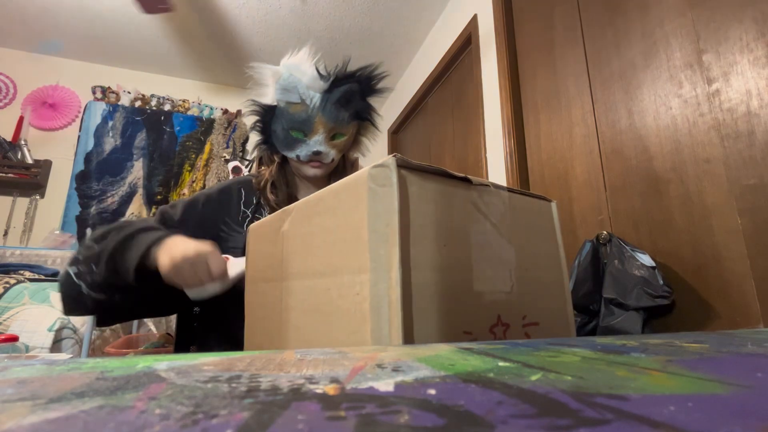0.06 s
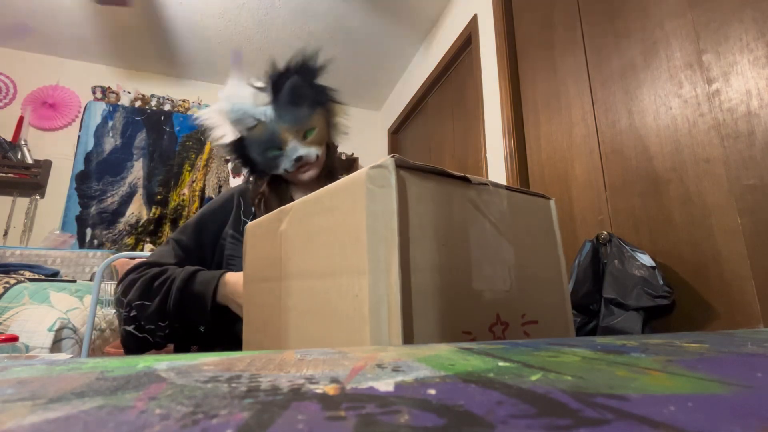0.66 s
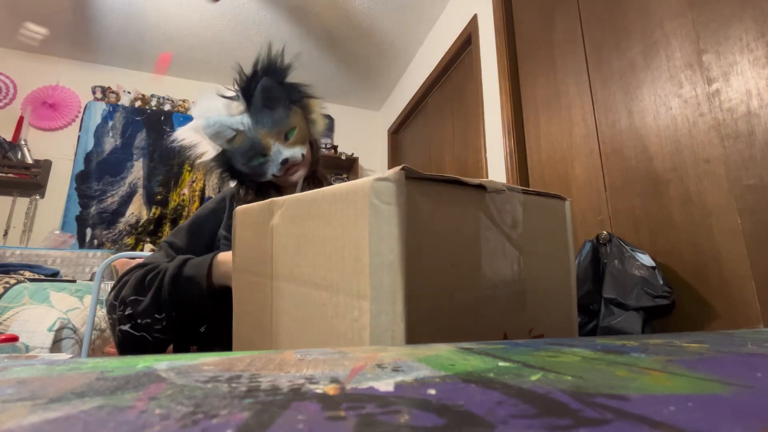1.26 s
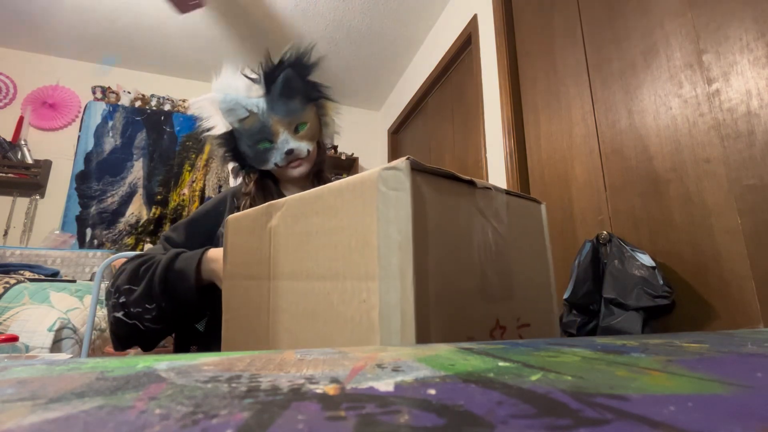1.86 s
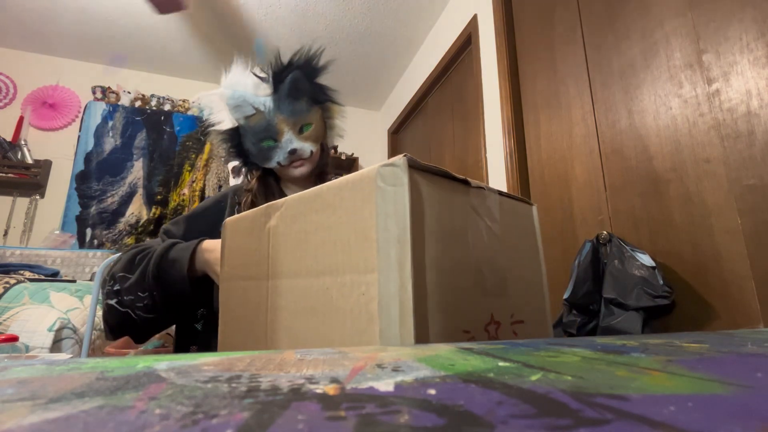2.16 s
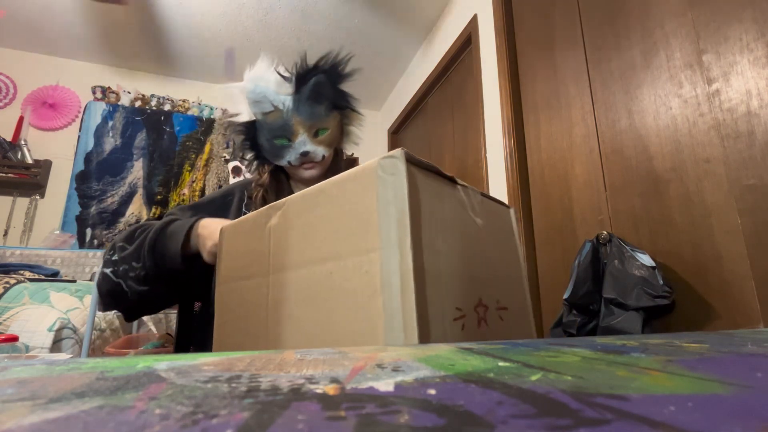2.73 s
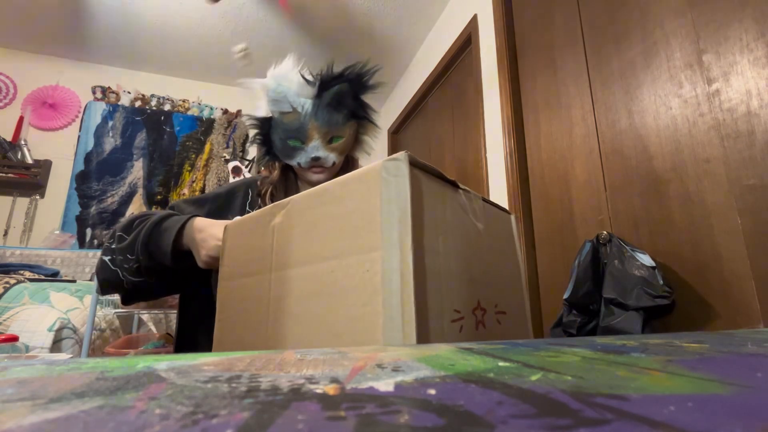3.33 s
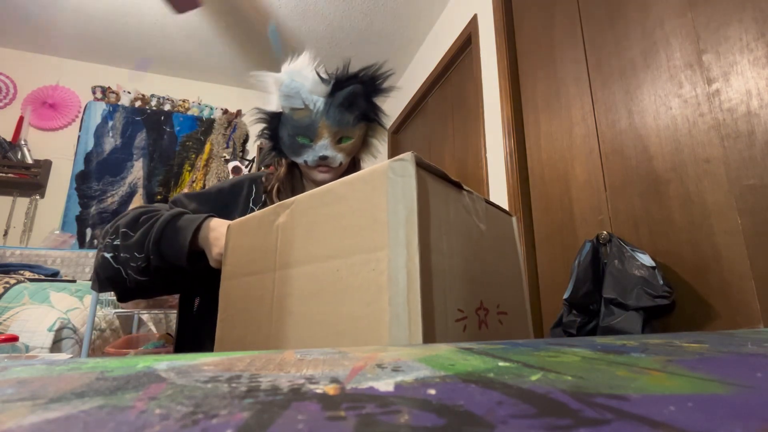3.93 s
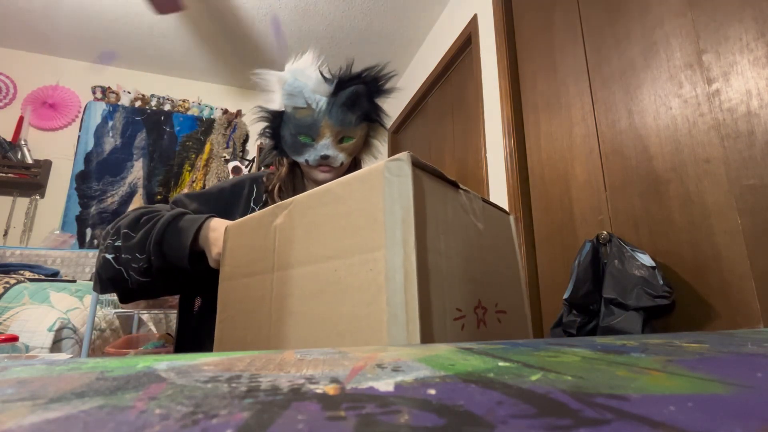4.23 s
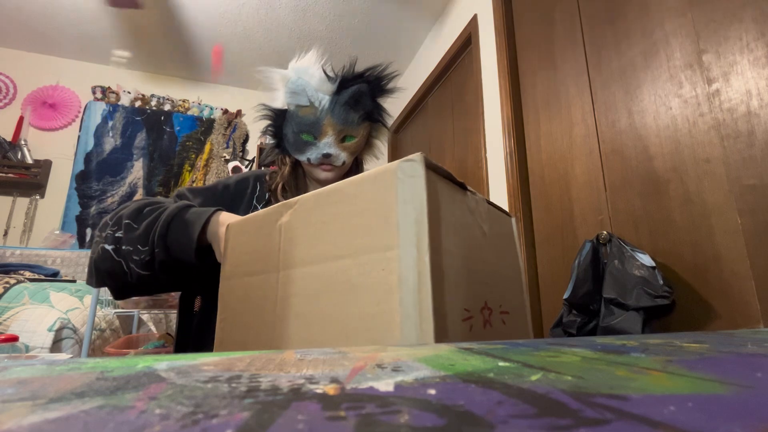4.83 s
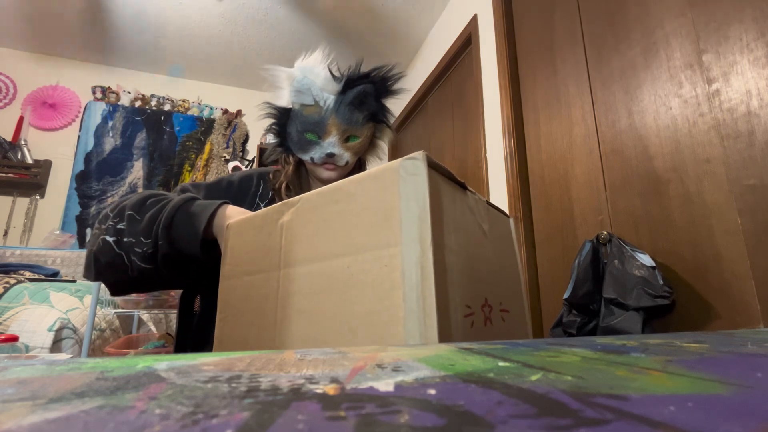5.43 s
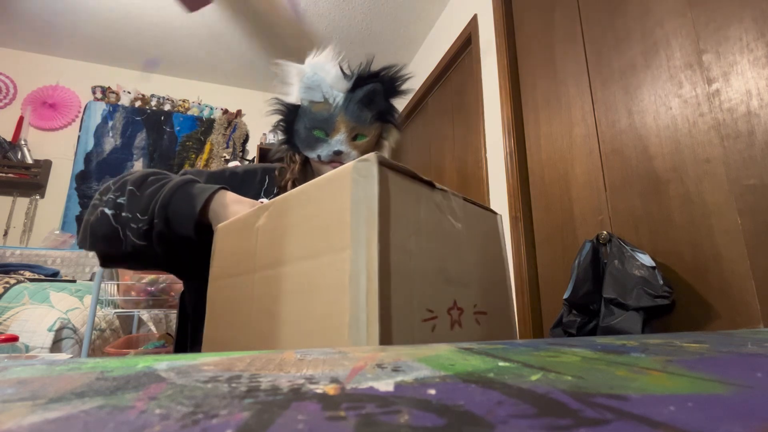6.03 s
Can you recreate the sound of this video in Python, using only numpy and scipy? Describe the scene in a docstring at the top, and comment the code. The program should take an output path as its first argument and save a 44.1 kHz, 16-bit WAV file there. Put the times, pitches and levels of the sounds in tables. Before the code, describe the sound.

Scissors cut through the tape on a large cardboard box, close by in a small, quiet room with little echo. For the first two seconds the blade slides in light, scratchy strokes, with tiny crackles and soft knocks that ring the hollow box, easing off briefly around 1 second. At about 2.3 seconds it sticks and judders with a short squeak. At 2.55 seconds it pops through with a thump and sharp clicks, the loudest moment, and a smaller snap follows. From 3.2 seconds the strokes press harder, hissing on the tape and rasping on the cardboard over a low rumble from the panels. Creaky judders return around 3.9 seconds. More pops, knocks and clicks cluster near 4.8 seconds, followed by short squeaky catches and scrapes until about 5.6 seconds. A last stroke fades at 6 seconds.

```python
"""Scissors work through the tape on the far side of a large cardboard box, in a small room.
First the blade slides along the seam in light strokes, breaking fibres, with soft knocks that run
over the panels as falling chirps and ring the hollow box. At 2.3 s it sticks and judders; at 2.55 s
it pops through with sharp clicks. From 3.2 s the strokes press harder, from 3.9 s it judders again,
more pops come near 4.8 s, and a last stroke fades at 6 s."""
import sys
import numpy as np
from scipy import signal
from scipy.fft import rfft, irfft, next_fast_len
from scipy.io import wavfile
from scipy.ndimage import uniform_filter1d

SR = 44100
rng = np.random.default_rng(int(sys.argv[2]) if len(sys.argv) > 2 else 0)


def master_out(mix):
    """Clip the mix to full scale and print it as 16-bit PCM to the path in sys.argv[1]."""
    frames = np.transpose(np.atleast_2d(mix))
    ceiling = np.clip(frames, -1, 1)
    pcm = np.round(ceiling * 32767).astype(np.int16)
    wavfile.write(sys.argv[1], SR, pcm)


N = 268569
BINS_HZ = np.fft.rfftfreq(N, 1 / SR)

# Blade pushes, before trim: (start [s], swell [s], length [s], hiss [dB], rasp [dB], rumble [dB])
PUSHES = [(-0.01, 0.013, 0.011, -63.5, -90, -64), (0.063, 0.035, 0.027, -63, -61.5, -55),
          (0.163, 0.08, 0.15, -69.5, -62.5, -61), (0.31, 0.031, 0.22, -93, -63, -66),
          (0.483, 0.066, 0.11, -68.5, -57.5, -48), (0.614, 0.0253, 0.11, -72.5, -61.5, -56),
          (0.75, 0.0255, 0.16, -82, -75.5, -66), (0.965, 0.042, 0.092, -97, -90, -65.5),
          (1.08, 0.012, 0.008, -83, -96, -78.5), (1.328, 0.0255, 0.033, -73, -74, -65),
          (1.332, 0.21, 0.37, -76.5, -69, -58), (1.773, 0.003, 0.014, -59, -58, -54.5),
          (1.8, 0.03, 0.12, -90, -76, -73), (1.998, 0.131, 0.36, -103.5, -70, -48.5),
          (2.034, 0.1293, 0.14, -63, -52, -61), (2.337, 0.0746, 0.092, -73.5, -60, -42),
          (2.492, 0.026, 0.16, -66.5, -63, -55), (2.537, 0.004, 0.0072, -47.5, -49.5, -41),
          (2.661, 0.056, 0.12, -64, -68.5, -50), (2.779, 0.021, 0.0433, -82, -69, -50),
          (3.179, 0.0251, 0.24, -62.5, -54, -52), (3.257, 0.047, 0.058, -80, -65.5, -41),
          (3.47, 0.1067, 0.177, -63, -56, -58), (3.634, 0.0414, 0.085, -53, -52, -54),
          (3.858, 0.0242, 0.088, -60.5, -41, -38), (3.889, 0.0336, 0.083, -57, -49.5, -39),
          (4.1, 0.0254, 0.025, -50, -42.5, -45.5), (4.113, 0.015, 0.17, -55, -52.5, -49.5),
          (4.283, 0.1225, 0.11, -73, -52, -40.5), (4.435, 0.0173, 0.054, -60.5, -52.5, -47),
          (4.54, 0.1247, 0.14, -53, -51.5, -50), (4.612, 0.0308, 0.055, -57, -47, -34.5),
          (4.795, 0.013, 0.079, -51.5, -39.5, -46), (5.006, 0.0311, 0.063, -56.5, -40.5, -50),
          (5.046, 0.0366, 0.11, -49.5, -47.5, -46.5), (5.198, 0.032, 0.092, -63.5, -54, -56),
          (5.226, 0.0473, 0.087, -58, -51, -44), (5.489, 0.021, 0.0427, -74, -47, -42.5),
          (5.556, 0.046, 0.069, -83.5, -59.5, -59), (5.59, 0.085, 0.12, -52.5, -50, -49.5),
          (5.743, 0.0557, 0.3, -61, -55.5, -50)]
# Hand steadying the box, before trim: (hiss [dB], rasp [dB], rumble [dB])
RESTING_HAND = (-84, -80.5, -77.5)
def push_levels(blade_release_db_per_s=307, panel_release_db_per_s=217):
    """Hiss, rasp and rumble in dB: pushes add their power to that of the resting hand."""
    power = from_db(RESTING_HAND)[:, None] ** 2 * np.ones(N)
    for start_s, swell_s, length_s, *levels_db in PUSHES:
        t = np.arange(max(0, -start_s), length_s + .5, 1 / SR)
        rise = np.sin(np.pi / 2 * np.clip(t / swell_s, 0, 1)) ** 2
        released_s = np.clip(t - length_s, 0, 1)
        blade = rise * from_db(-blade_release_db_per_s * released_s)
        panel = rise * from_db(-panel_release_db_per_s * released_s)
        for layer, level_db, envelope in zip(power, levels_db, [blade, blade, panel]):
            add(layer, start_s, (from_db(level_db) * envelope) ** 2)
    return 10 * np.log10(power)


def fibres(level_db, spectrum, per_s, spread_db, flutter_db, flutter_hz, trim_db):
    """Fibres break under the blade, many small and a few large, heard through the box."""
    sizes = from_db(spread_db * np.minimum(rng.exponential(1, N), 4))
    clicks = sizes * rng.choice([-1, 1], N) * (rng.random(N) < per_s / SR)
    force = clicks * from_db(flutter_db * wander(flutter_hz, N))
    return unit_rms(box_modes(force, lambda f: gain(spectrum, f))) * from_db(level_db + trim_db)


# Spectra of tape, card, panel and tearing fibres: (frequency [Hz], level [dB])
TAPE_HISS = [(300, -18), (900, 5.5), (1500, -4), (2200, -1.5), (2800, -1.5), (3600, -2), (5300, 0),
             (7000, -5), (9500, -10), (12000, -14), (15500, -12)]
CARD_RASP = [(60, -10), (160, -3.5), (260, -1), (450, 1), (700, -1), (1000, -6), (1900, -8.5),
             (2800, -22.5), (6000, -50)]
PANEL_RUMBLE = [(25, -18), (55, 1.5), (100, 1.5), (135, 2.5), (170, -10), (300, -18), (800, -50.5)]
FIBRE_SNAP = [(300, -56), (900, 10), (1800, 5), (3500, -1.5), (6000, 6.5), (8500, -1), (11000, -4),
              (15500, -8)]
# Edge of the scrape, set by blade angle: (time [s], treble boost [dB])
BLADE_EDGE = [(0, 12), (0.8, 15.5), (1.8, 14.5), (2.3, 11.5), (3.4, 3), (5.3, 4.5), (5.7, 7.5), (5.95, 17)]
def blade_scrape(shelf_hz=7000, ripple_db=-0.03):
    """The sliding blade hisses on the tape, rasps on the card and shakes the panel."""
    hiss_db, rasp_db, rumble_db = push_levels()
    hiss = fibres(hiss_db, TAPE_HISS, per_s=6000, spread_db=1.5,
                  flutter_db=-1.95, flutter_hz=74.2, trim_db=-3.5)
    rasp = fibres(rasp_db, CARD_RASP, per_s=2000, spread_db=0.5,
                  flutter_db=1.43, flutter_hz=57.5, trim_db=-2.5)
    rumble = fibres(rumble_db, PANEL_RUMBLE, per_s=670, spread_db=1.8,
                    flutter_db=0, flutter_hz=25, trim_db=-8)
    crackle = fibres(hiss_db, FIBRE_SNAP, per_s=260, spread_db=0.5,
                     flutter_db=0.5, flutter_hz=15, trim_db=-14)
    hz, t, bands = signal.stft(hiss + rasp + crackle, SR, nperseg=512, noverlap=384)
    # Contact moving over the flaps: a trace of ripple in narrow bands.
    ripple = uniform_filter1d(rng.standard_normal(bands.shape), size=3, axis=0)
    ripple = unit_rms(uniform_filter1d(ripple, size=45, axis=1))
    shelf = hz ** 2 / (hz ** 2 + shelf_hz ** 2)
    edge_db = np.outer(shelf, np.interp(t, *np.transpose(BLADE_EDGE)))
    bands = bands * from_db(ripple_db * ripple + edge_db)
    return signal.istft(bands, SR, nperseg=512, noverlap=384)[1][:N] + rumble


# Blade knocks and tape pops, before trim: (time [s], body [dB], centre [Hz], thump [dB], snap [dB])
KNOCKS_AND_POPS = [(0.09, -56.5, 530, -50.5, -76), (0.122, -47, 590, -45.5, -89),
                   (0.179, -49.5, 228, -66, -68), (0.341, -39, 412, -53.5, -68),
                   (0.463, -37.5, 670, -76, -58), (0.528, -70.5, 503, -51, -67),
                   (0.629, -42, 308, -77, -90), (0.684, -28.5, 408, -54, -63),
                   (0.868, -47.5, 346, -70, -90), (0.902, -44, 417, -57, -75),
                   (0.968, -49.5, 394, -56, -98), (1.595, -26.5, 450, -55, -50.5),
                   (1.781, -45.5, 700, -64, -53), (2.107, -38.5, 493, -49, -76.5),
                   (2.42, -48, 470, -47, -60), (2.472, -42.5, 244, -70, -68), (2.55, -17, 566, -30, -31.5),
                   (2.554, -9.5, 270, -24.5, -37), (2.563, -23, 200, -30.5, -52),
                   (2.753, -28.5, 700, -58, -48.5), (3.075, -48.5, 600, -51, -93.5),
                   (3.152, -44, 610, -43, -71), (3.204, -41, 497, -52.5, -81),
                   (3.246, -36, 480, -46, -80.5), (3.662, -43.5, 680, -70, -52.5),
                   (3.74, -43.5, 574, -41.5, -68), (3.841, -41.5, 452, -50, -64),
                   (3.876, -28, 420, -73, -70), (4.447, -24.5, 560, -46.5, -53.5),
                   (4.476, -35, 506, -54, -69), (4.633, -44.5, 200, -55, -66),
                   (4.649, -30.5, 494, -64.5, -61), (4.701, -33, 221, -43, -69),
                   (4.741, -26, 697, -29, -43.5), (4.882, -19, 340, -45, -39), (4.891, -24, 497, -56, -57),
                   (5.037, -29, 1080, -63, -50.5), (5.322, -35.5, 570, -53, -53.5),
                   (5.694, -65, 745, -43.5, -48)]
def knock(time_s, body_db, centre_hz, thump_db, snap_db, size=6144):
    """A blow spreads as a bending wave, treble first, and bounces between the panel edges."""
    t = np.arange(size) / SR
    lead_samples = size // 32
    bounces, crack = rng.standard_normal((2, size))
    blow = 0.06 * bounces * np.exp(-t / 0.0086)
    blow[0] = 1
    blow = np.roll(blow, lead_samples)

    def bending_wave(hz, octaves, travel):
        """A band around hz, delayed by travel / sqrt(f) seconds."""
        def band(f):
            return octave_band(f + 1, hz, octaves) * np.exp(-4j * np.pi * travel * np.sqrt(f))
        return unit_peak(box_modes(blow, band))

    body = from_db(body_db - 5) * bending_wave(centre_hz, octaves=0.93, travel=0.0802)
    thump = from_db(thump_db + 1) * bending_wave(hz=87, octaves=0.57, travel=0.1626)
    tear = np.roll(crack * (np.exp(-t / 0.00046) + 0.38 * np.exp(-t / 0.0203)), lead_samples)
    snap = from_db(snap_db + 8) * unit_peak(box_modes(tear, lambda f: gain(FIBRE_SNAP, f)))
    return time_s - lead_samples / SR, body + thump + snap


# Card jerked by a slip: (frequency [Hz], level [dB])
CARD_JERK = [(100, -29), (300, 10), (1100, 0.5), (2200, -7.5), (5000, -17), (10000, -44)]
# Blade catches, before trim:
# (peak time [s], swell [s], fade [s], level [dB], slip rate [Hz], glide [octaves/s])
CATCHES = [(2.32, 0.092, 0.071, -54, 599, 1), (2.366, 0.015, 0.023, -42, 612, -7.5),
           (2.395, 0.027, 0.02, -35, 583.6, -3.5), (3.945, 0.073, 0.062, -35, 577.4, 0.5),
           (4.127, 0.014, 0.035, -29, 611, 0.9), (4.83, 0.03, 0.043, -35.5, 499.4, -1.5),
           (4.858, 0.026, 0.011, -26, 402, -3), (4.902, 0.017, 0.0297, -23.5, 204.4, -5),
           (5.053, 0.029, 0.0282, -31.5, 593.4, -7.5), (5.124, 0.055, 0.068, -48, 259.9, -10.5),
           (5.26, 0.006, 0.045, -37.5, 258.5, 27), (5.295, 0.041, 0.016, -28, 550, 12.5),
           (5.326, 0.014, 0.023, -40, 591, 0), (5.519, 0.015, 0.022, -29, 595, 2.5),
           (5.539, 0.028, 0.04, -37.5, 380, -7.5), (5.58, 0.029, 0.025, -39.5, 235, -5.5)]
def judder(peak_s, swell_s, fade_s, level_db, slip_hz, glide_oct_per_s,
           jitter=0.07, shimmer_db=1.56, overtone_db_per_oct=-25, grit_db=-9,
           jerk_db=-18, jerk_spread_db=4, depth_db=17.5, trim_db=-4):
    """Stick and slip at an unsteady, gliding rate; each slip jerks the card by its own amount."""
    t = np.arange(-swell_s, fade_s, 1 / SR)
    rate_hz = slip_hz * 2 ** (glide_oct_per_s * t) * (1 + jitter * wander(190, len(t)))
    phase = 2 * np.pi * np.cumsum(rate_hz) / SR
    tone = sum(from_db(overtone_db_per_oct * np.log2(k)) * np.sin(k * phase) for k in range(1, 5))
    grit = unit_rms(wander(200, len(t)) * np.cos(phase))  # uneven slips smear the tone
    slips = np.diff(phase // (2 * np.pi), prepend=0)
    jerks = slips * from_db(jerk_spread_db * rng.standard_normal(len(t)))
    card = unit_rms(box_modes(jerks, lambda f: gain(CARD_JERK, f)))
    sound = unit_rms(tone) + from_db(grit_db) * grit + from_db(jerk_db) * card
    sound *= from_db(shimmer_db * wander(130, len(t)))
    swell_db = -depth_db * np.maximum(-t / swell_s, t / fade_s)
    envelope = from_db(level_db + swell_db + trim_db) * signal.windows.tukey(len(t), .1)
    return peak_s - swell_s, unit_rms(sound) * envelope


# Sharp clicks: (time [s], peak [dB], centre [Hz])
CLICKS = [(0.461, -50, 4440), (0.681, -46, 4480), (0.74, -57, 7500), (0.761, -53, 7500), (0.798, -52, 8500),
          (0.906, -58, 4500), (0.922, -61, 5000), (1.11, -57, 11500), (1.121, -64, 11500),
          (1.601, -49, 7500), (1.782, -43, 11000), (2.42, -50, 7900), (2.55, -23, 5000), (2.556, -19, 6100),
          (2.564, -24, 5030), (2.754, -33, 4700), (4.742, -36, 2900), (4.821, -42, 3550),
          (4.883, -33, 3000), (4.886, -28.5, 4440), (4.894, -44, 8500), (5.021, -45, 4960),
          (5.046, -36, 2310), (5.319, -39, 9000), (5.328, -52, 8000)]
def click(time_s, peak_db, centre_hz, octaves=0.7, ring_s=0.00041, rattle_s=0.006, size=2048):
    """The blades click or a fibre snaps, with a faint short rattle after it."""
    t, f = np.arange(size) / SR, np.fft.rfftfreq(size, 1 / SR)
    lead_samples = size // 32
    envelope = np.exp(-t / ring_s) + 0.1 * np.exp(-t / rattle_s)
    force = np.roll(rng.standard_normal(size) * envelope, lead_samples)
    sound = irfft(rfft(force) * octave_band(f + 1, centre_hz, octaves))
    return time_s - lead_samples / SR, from_db(peak_db) * unit_peak(sound)


# Hollow box and, from about 3 kHz, steel blades: (frequency [Hz], width [Hz], gain re panel [dB])
MODES = [(121.5, 24, 0.5), (210, 20, 0.5), (244.6, 34, 4.5), (325.7, 55, 8), (393.5, 22, -2.5),
         (579, 56, 7.5), (681, 31, 3.5), (825, 12, -8.5), (1315, 97, -7.5), (1495, 35, -15),
         (2300, 750, -7.5), (2980, 36, -3), (8100, 90, -2)]
def box_modes(force, spectrum):
    """A force, coloured by a spectrum, drives the box as a sounding board."""
    size = next_fast_len(len(force))
    f = np.fft.rfftfreq(size, 1 / SR)
    ring = 1 + sum(from_db(db) * 1j * f * width_hz / (hz ** 2 - f ** 2 + 1j * f * width_hz)
                   for hz, width_hz, db in MODES)
    return irfft(rfft(force, size) * ring * spectrum(f), size)[:len(force)]


def echoes(sound, start_s, decay, send, size, patterns, block_size=4096, taps_per_s=4000):
    """Sparse reflections per port; the pattern changes each block: diffuse, with no hollow ring."""
    shape = (patterns, 2, size)
    taps = rng.choice([-1., 1.], shape) * (rng.random(shape) < taps_per_s / SR)
    taps *= np.arange(size) / SR > start_s
    hz, t, bands = signal.stft(taps, SR, nperseg=128)
    t60_s = lookup(decay, hz)[:, None]
    tails = signal.istft(bands * from_db(-60 * t / t60_s) / np.sqrt(t60_s), SR, nperseg=128)[1]
    tails /= np.linalg.norm(tails, axis=-1, keepdims=True)
    sent = np.pad(irfft(rfft(sound) * gain(send, BINS_HZ), N), block_size)
    wet = np.zeros((2, len(sent) + tails.shape[-1]))
    for k, at in enumerate(range(0, N + block_size, block_size // 2)):
        block = sent[at:at + block_size] * signal.windows.cosine(block_size)
        answer = signal.fftconvolve(block[None], tails[k % patterns], axes=-1)
        wet[:, at:at + answer.shape[-1]] += answer
    return wet[:, block_size:block_size + N]


# Decay of close reflections, flap scatter and room: (frequency [Hz], T60 [s])
NEAR_DECAY = [(100, 0.041), (15000, 0.012)]
FLAP_DECAY = [(100, 0.05), (15000, 0.05)]
ROOM_DECAY = [(100, 0.22), (300, 0.2), (800, 0.19), (2000, 0.14), (6000, 0.17), (15000, 0.22)]
# Close reflections, with two narrow treble notches from microphone processing and coding:
# (frequency [Hz], level [dB])
NEAR_LEVEL = [(100, -29), (400, -9), (900, -4.5), (2000, -1), (3700, 1.5), (6000, -6), (9000, -5),
              (10200, -27), (11200, -6.5), (12500, -22), (14200, -8.5)]
# Room reverberation: (frequency [Hz], level [dB])
ROOM_LEVEL = [(60, -21.5), (150, -12.5), (280, -9.5), (600, -10), (2000, -8), (4000, -13), (8000, -29),
              (15000, -20)]
def reflections(blows, scrape):
    """Table and wall return the blows, the flaps diffuse the scrape, the room answers both."""
    near = echoes(blows, start_s=0.0006, decay=NEAR_DECAY, send=NEAR_LEVEL, size=2048, patterns=24)
    flaps = echoes(scrape, start_s=0.002, decay=FLAP_DECAY, send=NEAR_LEVEL, size=2048, patterns=24)
    room = echoes(scrape + blows, start_s=0.01, decay=ROOM_DECAY, send=ROOM_LEVEL, size=16384, patterns=5)
    return near + flaps + room


# Phase between microphone ports: (frequency [Hz], left lead [rad])
LEFT_LEAD = [(0, 0), (500, -.8), (1400, -.2), (2100, 1.3), (2700, 2.9), (6400, 3.6), (7400, 5.6),
             (8500, 6.5), (10200, 9.4), (12000, 12.3), (13200, 12.9), (14600, 15.6)]
# Balance between ports: (frequency [Hz], left minus right [dB])
LEFT_BALANCE = [(100, -0.66), (380, 0.75), (700, 0.4), (1300, -2), (2400, -0.82), (4400, -2.9),
                (9000, 0.84)]
def microphone_ports(direct, reflected):
    """Sound reaches the two ports a little apart in phase and level."""
    side = np.array([[.5], [-.5]])
    phase = side * np.interp(BINS_HZ, *np.transpose(LEFT_LEAD))
    heard = rfft(direct) * np.exp(1j * phase) + rfft(reflected)
    return irfft(heard * from_db(side * lookup(LEFT_BALANCE, BINS_HZ)), N)


# Room noise: (frequency [Hz], relative level [dB])
ROOM_NOISE = [(20, -3.5), (45, 12.5), (58, 13.5), (85, -26), (140, -4.5), (300, -17.5), (700, -19.5),
              (1900, -18.5), (2800, -60.5), (6000, -54), (8300, -47.5), (15000, -30.5)]
def room_tone(level_db=-70):
    """Faint steady rumble and hiss, half of its power common to both ports."""
    noise = rng.standard_normal(N) + rng.standard_normal((2, N))
    return from_db(level_db) * unit_rms(irfft(rfft(noise) * gain(ROOM_NOISE, BINS_HZ), N))


def from_db(db):
    return 10 ** (np.asarray(db) / 20)


def unit_rms(x):
    return x / np.sqrt(np.mean(x ** 2) + 1e-24)


def unit_peak(x):
    return x / abs(x).max()


def lookup(table, hz):
    """Interpolates on a log-frequency axis."""
    f, value = np.transpose(table)
    return np.interp(np.log(hz + 1), np.log(f + 1), value)


def gain(table_db, hz):
    return from_db(lookup(table_db, hz))


def octave_band(f, centre_hz, octaves):
    """Gaussian band on a log-frequency axis."""
    return np.exp(-.5 * (np.log2(f / centre_hz) / octaves) ** 2)


def wander(hz, size):
    """Unit-rms noise, low-passed at hz."""
    f = np.fft.rfftfreq(size, 1 / SR)
    return unit_rms(irfft(rfft(rng.standard_normal(size)) / (1 + (f / hz) ** 4), size))


def add(mix, start_s, sound):
    part = mix[max(0, round(start_s * SR)):][:len(sound)]
    part += sound[:len(part)]


def scene():
    """Scrape, judders, knocks and clicks with their reflections, over the room tone."""
    scrape, blows = blade_scrape(), np.zeros(N)
    for row in CATCHES:
        add(blows, *judder(*row))
    for row in KNOCKS_AND_POPS:
        add(blows, *knock(*row))
    for row in CLICKS:
        add(blows, *click(*row))
    return microphone_ports(scrape + blows, reflections(blows, scrape)) + room_tone()


def record(dry, low_cut_hz=42, high_cut_hz=14200, band_limit_hz=15750):
    """Bass and treble roll-offs and band limit of the recorder."""
    thinned = signal.sosfilt(signal.butter(3, low_cut_hz, "highpass", fs=SR, output="sos"), dry)
    dulled = signal.sosfilt(signal.butter(8, high_cut_hz, fs=SR, output="sos"), thinned)
    band_limit = signal.firwin(511, band_limit_hz, window=("kaiser", 9), fs=SR)
    return signal.oaconvolve(dulled, band_limit[None], "same")


dry = scene()
out = record(dry)
master_out(out)
```